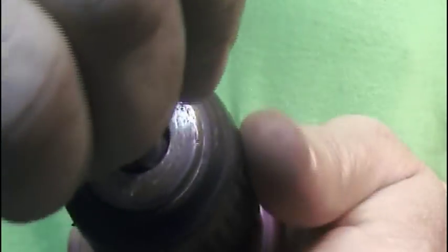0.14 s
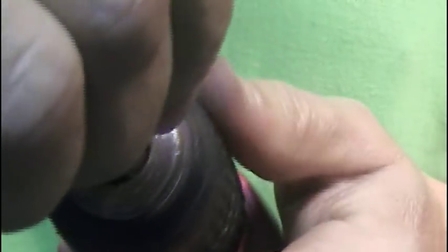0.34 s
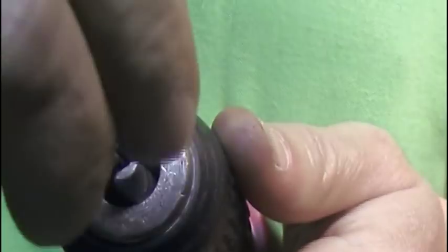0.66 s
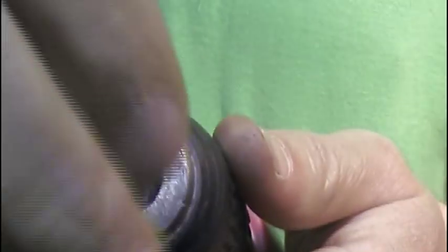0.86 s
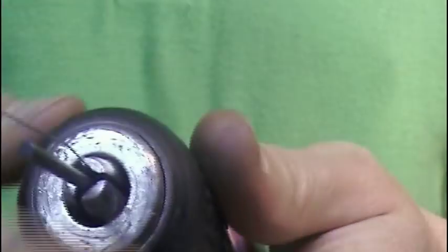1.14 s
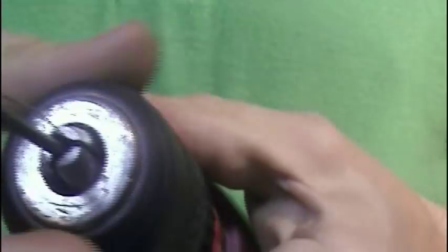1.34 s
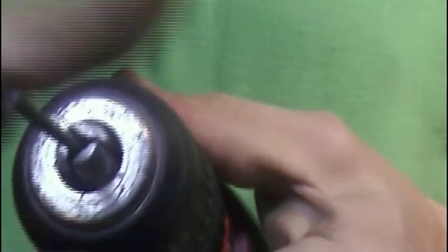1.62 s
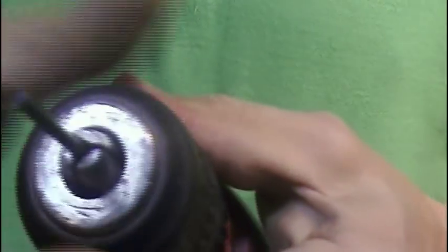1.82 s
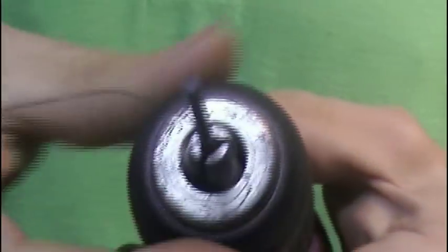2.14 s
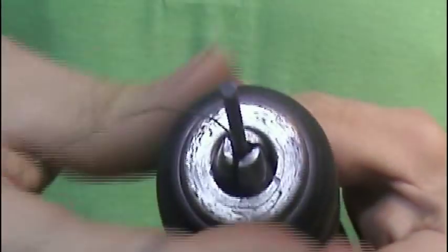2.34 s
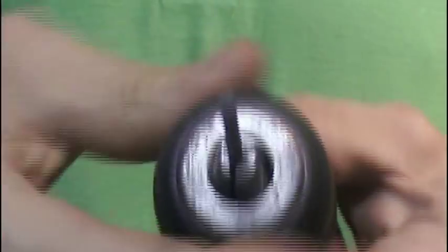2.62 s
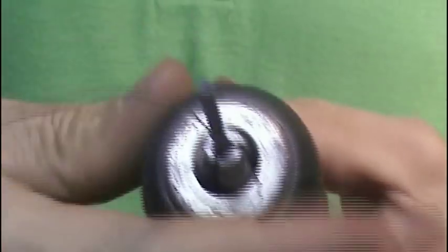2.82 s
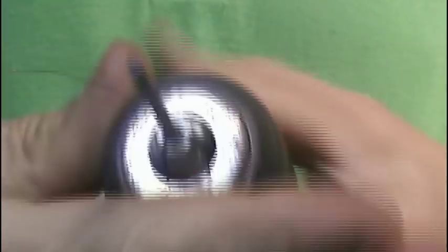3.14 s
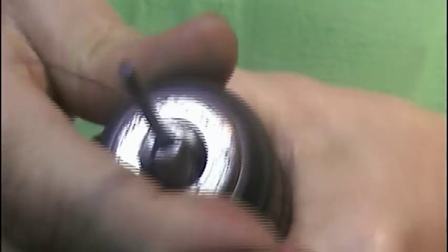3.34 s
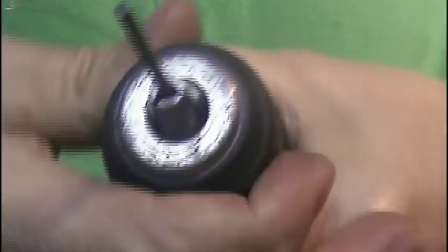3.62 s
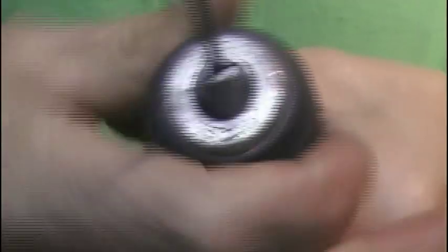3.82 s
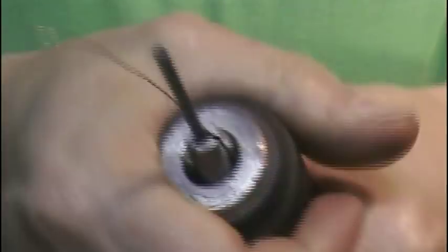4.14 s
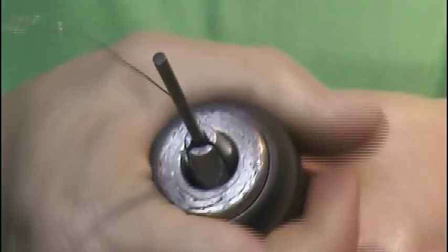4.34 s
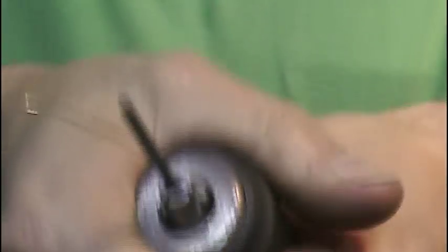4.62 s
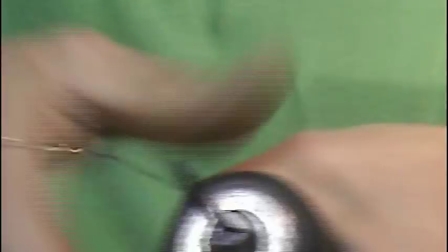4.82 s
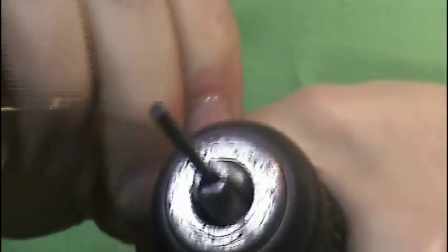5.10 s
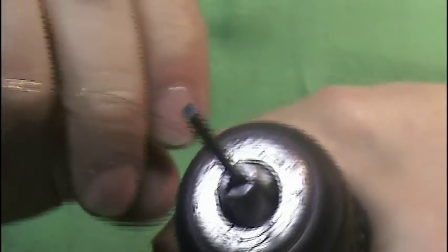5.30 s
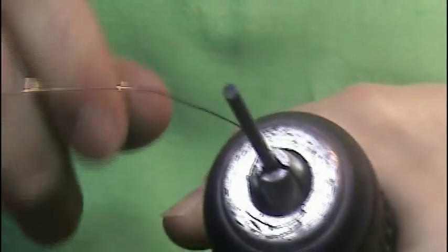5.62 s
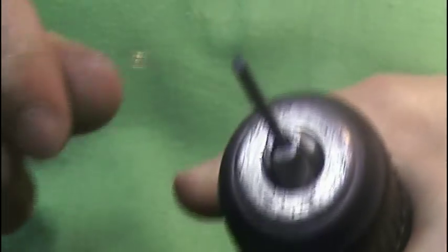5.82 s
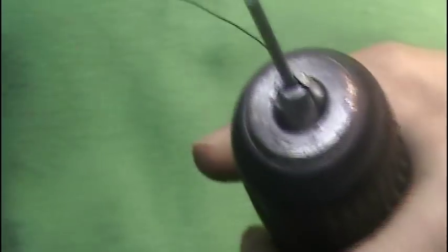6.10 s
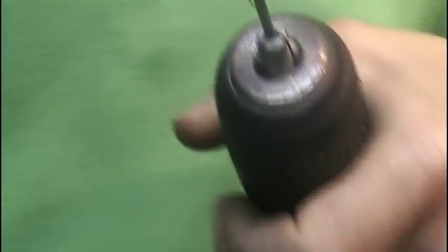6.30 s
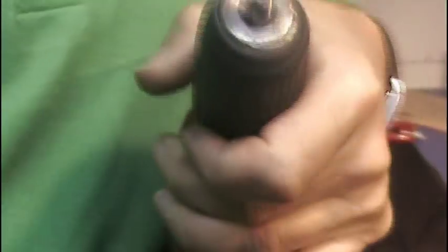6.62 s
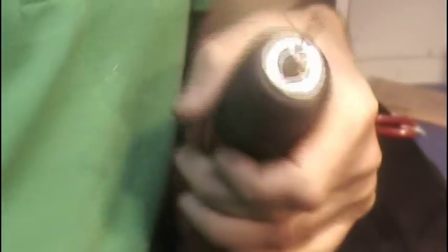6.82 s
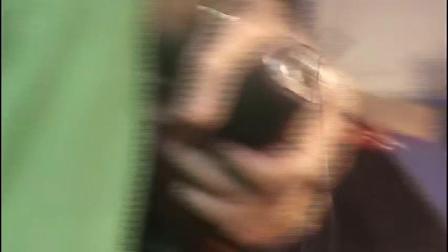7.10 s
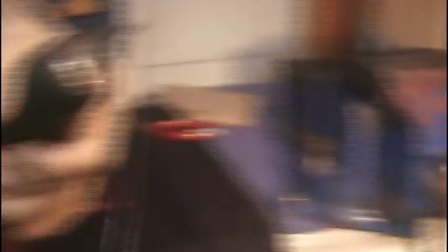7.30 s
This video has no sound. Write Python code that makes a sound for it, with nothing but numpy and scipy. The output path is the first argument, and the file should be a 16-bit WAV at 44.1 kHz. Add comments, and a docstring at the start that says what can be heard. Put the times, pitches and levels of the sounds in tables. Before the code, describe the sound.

Close, dry ratchety clicking and faint scraping of a hand-tightened chuck, a quiet pause, then a grip knock, cloth rustle and double clack.

```python
"""Keyless drill chuck tightened by hand

Hands twist the sleeve shut on a steel pin and a thin wire, close by. Sleeve and jaws click as short noisy
forces on damped bodies; thread and palm scrape as coloured slips; harder knocks ring the housing's modes.
Then the drill is gripped and lifted: cloth noise, knocks of damped modes and a double clack. A quiet
workshop's rumble, hiss and faint whine, made of shaped noise and sines, lie beneath."""
import sys
import numpy as np
from scipy import signal
from scipy.fft import rfft, irfft, next_fast_len
from scipy.io import wavfile
from scipy.ndimage import uniform_filter1d, map_coordinates

SR = 44100
rng = np.random.default_rng(int(sys.argv[2]) if len(sys.argv) > 2 else 0)


def transcribe(u):
    """Save the signal u as a 16-bit wav file named by the first command-line argument.

    u: samples, shape (n,) or (channels, n), limited to [-1, 1]; the rate is SR.
    q: integer samples, one column per channel.
    """
    v = np.clip(np.atleast_2d(u).T, -1, 1)
    q = np.round(v * 32767).astype(np.int16)
    wavfile.write(sys.argv[1], SR, q)


N = 328986
T = np.arange(N) / SR

# Clear contacts of sleeve and jaws. Each row: time in seconds, sleeve level in dB, jaw level in dB re sleeve,
# sleeve pitch in Hz, nominal chatter length in ms.
CONTACTS = [(0.062, -45.5, -2, 1600, 2.2), (0.113, -31.5, 0.5, 1610, 2.6), (0.2447, -32, -2.5, 1170, 1.5),
            (0.2521, -30, -6.5, 1000, 1.1), (0.4526, -44.5, 2, 2030, 2.1), (1.1217, -12, 3, 1680, 2.4),
            (1.2858, -38.5, 0, 2010, 1.4), (1.3327, -31.5, -11, 2120, 3.2), (1.3425, -26, 0.5, 1630, 2.4),
            (1.356, -23.5, -13, 1490, 5.1), (1.3764, -23.5, -2.5, 1470, 13), (1.41, -25, -3, 1880, 3.6),
            (1.5205, -37, -6, 970, 5.5), (1.5474, -28, -10, 1960, 2.1), (1.5616, -16, -8, 1230, 1.7),
            (1.5722, -16, -6, 1350, 4.7), (1.5929, -23.5, -0.5, 1720, 3.8), (1.611, -25, -7, 1170, 1.8),
            (1.6204, -24, -2, 1960, 2.2), (1.6487, -20.5, -13, 1150, 4.3), (1.7124, -20, -0.5, 1710, 2.2),
            (1.7193, -17.5, -9, 1180, 3.1), (1.7767, -22.5, -2.5, 1540, 3.2),
            (1.7929, -18, -4.5, 2100, 9.6), (1.8058, -25, -4, 1650, 4.3), (1.822, -23.5, -3.5, 1420, 3.1),
            (1.8514, -23, -14, 1370, 6), (2.0574, -41, -6, 1410, 2.3), (2.1623, -26.5, -10, 1470, 4.8),
            (2.1893, -26, -6, 1440, 1.9), (2.26, -23.5, -7.5, 1340, 3.1), (2.3182, -28, -4.5, 1080, 8.8),
            (2.425, -26.5, -12, 1960, 1.1), (2.4979, -19.5, -8, 1810, 4.2), (2.5706, -31.5, -8, 1233, 1.4),
            (2.5971, -33.5, -1.5, 1520, 1.1), (2.6372, -19, -1.5, 1403, 2.7), (2.6584, -22, -7, 1460, 2.1),
            (2.6678, -15.5, -4, 1960, 3.4), (2.6886, -27.5, -4.5, 1500, 5.9), (2.7964, -29, -8, 1760, 5),
            (2.8817, -28.5, -3, 1604, 4.2), (2.9476, -17, -1.5, 1470, 3), (3.0531, -21, -14, 1190, 3.3),
            (3.1453, -29, -9.5, 1100, 3), (3.329, -11, -2, 1570, 1.8), (3.4816, -24, -9, 2100, 2.2),
            (3.4999, -25.5, -4.5, 1060, 1.43), (3.5336, -27.5, -7.5, 1430, 2.4),
            (3.6104, -30.5, -6.5, 1680, 3.2), (3.6684, -40.5, 1, 2540, 3.1),
            (3.7106, -20.5, -0.5, 1500, 0.99), (3.8777, -28.5, -10.5, 1074, 3.5),
            (3.8996, -26.5, -15, 980, 0.94), (4.0434, -31.5, -3.5, 1610, 1.8),
            (4.0876, -29.5, 0.5, 1720, 4), (4.1593, -25.5, -10, 2000, 1.94), (4.2405, -28.5, -2, 2157, 2.8),
            (4.305, -40.5, 9, 2150, 0.9), (4.528, -16, -1, 1720, 3.36), (4.6757, -40, 1, 1720, 4.7),
            (5.086, -43.5, -1.5, 1830, 2.9), (5.128, -43.5, 7.5, 1510, 4), (5.1384, -28, -10.5, 1860, 0.81),
            (5.9973, -43.5, 1.5, 2000, 1.2), (7.0798, -28.5, 10, 1690, 1), (7.1024, -28.5, 9.5, 1980, 2.9),
            (7.1067, -24, 1, 1840, 6.1)]
# Twists of the hand on the sleeve. Each row: start in seconds, length in seconds, rubbing in dB before trim.
SLEEVE_TWISTS = [(0.086, .04, -48), (0.251, .13, -49.5), (1.306, 0.087, -40), (1.511, 0.41, -48),
                 (2.139, 0.11, -43), (2.31, 0.14, -43.5), (2.62, .07, -42), (2.751, 0.813, -45.5),
                 (3.519, 0.51, -50.5), (3.985, 0.16, -42), (4.17, .04, -42), (4.321, 0.38, -45.5)]
# Sleeve drags on its thread. Each row: start in seconds, length in seconds, level in dB before trim.
THREAD_DRAGS = [(1.33, 0.07, -35.5), (1.76, 0.054, -38.5), (2.317, 0.029, -33), (2.372, 0.08, -43.5),
                (2.775, 0.057, -42), (2.915, 0.079, -33.5), (3.305, 0.089, -30), (4.325, 0.07, -45)]
# Palm slides off the sleeve. Each row: peak in seconds, level in dB before trim.
PALM_SLIDES = [(4.756, -38.5), (4.818, -45.5)]
# Modes of the hand's knocks on the housing. Each row: time in seconds, nominal level in dB, pitch in Hz,
# t60 in seconds.
HAND_KNOCKS = [(.14, -41.5, 262, 0.085), (5.953, -36.5, 258, 0.066), (6.303, -42, 229.6, 0.22),
               (6.678, -32, 560, 0.062), (6.778, -15, 553, 0.032), (6.78, -22, 1700, .05),
               (7.033, -41, 497, 0.096), (7.235, -41, 192, 0.2)]
# Bumps of the drill that reach the microphone. Each row: time in seconds, nominal level in dB, pitch in Hz,
# t60 in seconds.
DRILL_BUMPS = [(7.071, -23, 37, 0.23), (7.073, -24, 109.4, 0.094), (7.101, -38, 180, 0.14)]
# Hand shifts on the drill and raises it. Each row: peak in seconds, rustle in dB and handling rumble in dB,
# both before trim.
LIFT_MOVES = [(6.13, -45, -65), (6.785, -37, -35.5), (7.15, -34.5, -33)]
# Hand slips on the grip. Each row: start in seconds, length in seconds, level in dB.
GRIP_SLIPS = [(6.61, 0.072, -45.5), (6.674, 0.029, -34.5), (6.745, 0.074, -38), (6.82, 0.042, -45),
              (7.025, 0.063, -48.5)]
# Drill brushes past cloth. Each row: peak in seconds, level in dB before trim.
CLOTH_SWISHES = [(7.17, -46.5), (7.32, -50.5)]

# Ring passed into the housing, changing through the scene. Each row: time in seconds, ring in dB re contact
# before trim.
HOUSING_COUPLING = [(0.2, -8.5), (1.6, -19), (4.5, -7.5), (7.1, -20)]
# Housing resonances. Each row: centre in Hz, width in Hz, level in dB re the broad answer.
HOUSING_RESONANCES = [(594, 70, -0.5), (932, 54, -0.5), (1300, 120, -5), (1800, 49, -3), (2255, 55, 10),
                      (2650, 94, -5), (3280, 450, 1.5), (4030, 120, -7)]
# Resonances of the cupped hand on the grip. Each row: centre in Hz, width in Hz, level in dB re the broad answer.
GRIP_RESONANCES = [(534, 130, -1.5), (1826, 170, 2), (3840, 170, -7)]

# Relative spectra of the bodies and noises. Each row: frequency in Hz, density in dB.
SLEEVE_SPECTRUM = [(40, -10), (200, -12.5), (450, -6), (800, 1), (1300, 1), (2200, -1), (2900, -8.5),
                   (4000, -9.5), (7000, -37), (16000, -60)]
JAW_SPECTRUM = [(300, -59), (1800, -21), (3000, 1.5), (3600, 7), (4700, 2), (5800, -10), (7500, -14),
                (10000, -14), (12500, -22), (15000, -43.5)]
HOUSING_SPECTRUM = [(60, -19), (250, -5.5), (600, -2.5), (1200, 0.5), (1800, 2.5), (2600, -4), (3600, -1),
                    (4500, -6.5), (5800, -11), (10000, -20.5), (12500, -31), (15000, -44)]
THREAD_SPECTRUM = [(100, -11), (400, -2), (900, -5), (1600, 0), (2600, -4), (3500, -3.5), (4600, -13),
                   (6000, -18), (10000, -18.5), (12500, -25), (15000, -44)]
BITE_SPECTRUM = [(100, -25), (400, -4), (900, -4), (1600, 3.5), (2600, 1.5), (3600, -3.5), (4700, -8),
                 (6000, -12.5), (10000, -20), (12500, -34), (15000, -51)]
PALM_SPECTRUM = [(2000, -4.5), (6000, -8), (9500, -1), (12000, -9), (13500, -17.5), (15500, -32)]
CLOTH_SPECTRUM = [(100, -5), (200, 0.5), (330, -7.5), (540, -1), (900, -4.5), (1700, -2.5), (2500, -1.5),
                  (4200, -6.5), (6500, -17), (10000, -24), (12800, -34), (15500, -61)]
BRUSH_SPECTRUM = [(3000, -26), (5200, -2), (5750, 4), (6600, -2.5), (8000, -3), (10000, -10), (13000, -22),
                  (15500, -38)]
HANDLING_SPECTRUM = [(20, -3), (45, 4.5), (90, 0), (200, -13.5), (400, -38), (1200, -51)]
ROOM_SPECTRUM = [(12, -41), (20, -14), (55, -7.5), (88, -14), (162, -20.5), (386, -25.5), (469, -26.5),
                 (510, -29), (586, -28), (637, -30), (819, -30), (2720, -34.5), (4370, -36), (9300, -41),
                 (15800, -63)]
# Faint electrical whine. Each row: frequency in Hz, level in dB before port balance.
WHINE_TONES = [(1490, -73.5), (2980, -74.5), (4500, -72.5)]
# Difference between the ports. Each row: frequency in Hz, side in dB re mid.
SIDE_SPECTRUM = [(100, -14), (300, -14), (550, -17), (1200, -28), (2500, -23.5), (5000, -9.5), (9000, -5),
                 (14000, -10)]

TICKS_PER_S, TICK_OVER_TWIST_DB, TICK_SPREAD_DB = 11, 5, 2  # level is over the twist's table value
TICK_TREBLE_DB, TICK_TREBLE_SPREAD_DB, TICK_CHATTER_MS = -2, 5, 2.6
TICK_HZ, TICK_OCTAVES_PER_DB = 1720, 0.3  # brighter ticks are pitched higher
RING_DB_PER_TREBLE_DB, CLEAN_STRIKE_DB = 1.0, 2.5  # ring grows with treble up to a clean strike


def clicks(contacts, mode_t60_s=0.0035, mode_share=0.27, snap=2.05, chatter_per_s=5000,
           slide=0.054, slide_s=0.00094):
    """Slide, snap and a few ms of chatter drive the damped plastic sleeve and the steel jaws."""
    lead = SR // 200
    track, t = np.zeros(N), np.arange(SR // 40) / SR
    sleeve, jaws = causal(SLEEVE_SPECTRUM), causal(JAW_SPECTRUM)
    for s, db, bright_db, hz, length_ms in contacts:
        decay = np.exp(-(t / (1.22 * length_ms / 1000)) ** 0.9)
        hits = rng.random(len(t)) < chatter_per_s / SR
        chatter = rng.standard_normal(len(t)) * hits * decay
        chatter[0] += snap / length_ms
        # dull contacts slide into place, bright ones strike clean
        slide_gain = slide * 2 / (1 + amp(bright_db))
        approach = slide_gain * rng.standard_normal(lead) * np.exp(-t[:lead][::-1] / slide_s)
        force = np.r_[approach, chatter]
        # the grip damps the sleeve and shifts its main resonance from touch to touch
        mode = mode_share * np.cos(2 * np.pi * hz * t) * amp(-60 * t / mode_t60_s)
        mode[0] += 1
        add(track, s - lead / SR, contact(force, signal.fftconvolve(sleeve, mode), db))
        add(track, s - lead / SR, contact(force, jaws, db + bright_db))
    return track


def ticks(count=16):
    """Faint contacts fall at random while the sleeve turns, louder in a firmer twist; rows like CONTACTS."""
    rows = []
    for start, length, twist_db in SLEEVE_TWISTS:
        times = start + np.cumsum(rng.gamma(2, .5, count)) / TICKS_PER_S
        scatter = np.clip(rng.standard_normal((count, 2)), -2, 2)
        for s, (force, hardness) in zip(times, scatter):
            db = twist_db + TICK_OVER_TWIST_DB + TICK_SPREAD_DB * force
            bright_db = TICK_TREBLE_DB + TICK_TREBLE_SPREAD_DB * hardness
            hz = TICK_HZ * 2 ** (TICK_OCTAVES_PER_DB * bright_db)
            if s < start + length:
                rows.append((s, db, bright_db, hz, TICK_CHATTER_MS))
    return rows


def housing(contacts, t60_s=0.2, trim_db=3, rise_s=0.0017):
    """Dense modes of housing and gears ring after each contact, most after clean strikes."""
    power, t = np.zeros(N), np.arange(SR // 3) / SR
    for s, db, bright_db, _, _ in contacts:
        share_db = np.interp(s, *np.transpose(HOUSING_COUPLING))
        share_db += RING_DB_PER_TREBLE_DB * min(bright_db, CLEAN_STRIKE_DB)
        envelope = amp(db + share_db + trim_db - 60 * t / t60_s) * (1 - np.exp(-t / rise_s))
        add(power, s, envelope ** 2)
    ring = filtered(noise(HOUSING_SPECTRUM), lambda hz: ringing(HOUSING_RESONANCES, hz))
    return np.sqrt(power) * patchy(ring, depth_db=2)


def scraping(rub_trim_db=-4, drag_trim_db=-1, palm_trim_db=-2, uneven_db=4.5):
    """The sleeve rubs round on its thread, bites now and then, and the palm slides off it."""
    rub_gain = strokes(SLEEVE_TWISTS, rise_s=0.027, sag_db=3) * amp(rub_trim_db + uneven_db * wobble(45))
    rub = rub_gain * patchy(friction(THREAD_SPECTRUM, slips_per_s=350, spread_db=9.5, smooth=0.84))
    drag_gain = amp(drag_trim_db) * strokes(THREAD_DRAGS, rise_s=0.0018, sag_db=8.5)
    drag = drag_gain * patchy(friction(BITE_SPECTRUM, slips_per_s=900, spread_db=5, smooth=0.54))
    palm_gain = amp(palm_trim_db) * swells(PALM_SLIDES, rise_s=0.035, fall_s=0.046)[0]
    return rub + drag + palm_gain * noise(PALM_SPECTRUM)


def thuds(rows, rise_s, rough):
    """Knocks and bumps made of damped modes of slightly unsteady pitch; the firm knock at 6.78 s has two."""
    track, t = np.zeros(N), np.arange(SR // 3) / SR
    for s, db, hz, t60_s in rows:
        drift = rough * np.cumsum(rng.standard_normal(len(t))) * np.sqrt(hz / SR)
        envelope = 2 * amp(db - 60 * t / t60_s) * (1 - np.exp(-t / rise_s))
        add(track, s, envelope * np.sin(2 * np.pi * hz * t + drift))
    return track


def lifting(rustle_trim_db=-1, rumble_trim_db=-3, swish_trim_db=-1):
    """Hand and cloth rustle on the drill as it is gripped and raised: slips coloured by the cupped hand."""
    rustle, rumble = swells(LIFT_MOVES, rise_s=0.18, fall_s=0.2)
    pressure = amp(rustle_trim_db) * rustle + strokes(GRIP_SLIPS, rise_s=0.0034, sag_db=-3)
    rub = friction(CLOTH_SPECTRUM, slips_per_s=1100, spread_db=4.5, smooth=0.95)
    rub = filtered(rub, lambda hz: ringing(GRIP_RESONANCES, hz))
    swish = amp(swish_trim_db) * swells(CLOTH_SWISHES, rise_s=0.14, fall_s=0.095)[0]
    swish = swish * patchy(noise(BRUSH_SPECTRUM))
    return pressure * patchy(rub) + swish + amp(rumble_trim_db) * rumble * noise(HANDLING_SPECTRUM)


def workshop(floor_db=-51, apart_db=-2):
    """Steady room rumble and hiss, partly different at each microphone port, with a faint whine."""
    common, apart = noise(ROOM_SPECTRUM), amp(apart_db) * noise(ROOM_SPECTRUM)
    whine = np.zeros(N)
    for hz, db in WHINE_TONES:
        whine += amp(db) * np.sqrt(2) * np.sin(2 * np.pi * hz * T + 1.8 * wobble(60))
    return amp(floor_db) * np.array([common + apart, common - apart]) + whine


def spread(x, scatter_s=0.00066):
    """Both ports hear the same close sound; the moving fingers scatter it a little differently to each."""
    t = np.arange(SR // 200) / SR
    paths = rng.standard_normal((2, len(t))) * t * np.exp(-t / scatter_s)
    paths /= np.linalg.norm(paths, axis=1, keepdims=True)
    a, b = signal.fftconvolve(x[None], paths, axes=1)[:, :N]
    pose = np.pi * wobble(6)
    side = filtered(a * np.cos(pose) + b * np.sin(pose), lambda hz: amp(along(SIDE_SPECTRUM, hz)))
    return np.array([x + side, x - side])


def contact(force, response, db):
    """A body's answer to a force, its energy set to this level over 5 ms."""
    sound = signal.fftconvolve(force, response)
    return amp(db) * sound * np.sqrt(.005 * SR / np.sum(sound ** 2))


def friction(points, slips_per_s, spread_db, smooth):
    """Tiny slips of uneven size on a smooth rub, coloured by the body; rms 1."""
    signs = (rng.random(N) < slips_per_s / SR) * rng.choice([-1, 1], N)
    slips = signs * amp(spread_db * np.clip(rng.standard_normal(N), -2, 2))
    force = unit(slips) + smooth * rng.standard_normal(N)
    return unit(signal.fftconvolve(force, causal(points))[:N])


def strokes(rows, rise_s, sag_db):
    """Pressure of short strokes that catch quickly, then ease off (or swell, if sag_db is negative)."""
    total = np.zeros(N)
    for s, length, db in rows:
        gate = np.interp(T, [s, s + rise_s, s + length, s + length + 4 * rise_s], [0, 1, 1, 0])
        total += gate * amp(db - sag_db * (np.clip((T - s) / length, 0, 1) - .5))
    return total


def swells(rows, rise_s, fall_s):
    """Gain per dB column of movements that swell and die away, by 20 dB in rise_s and in fall_s."""
    peaks, *columns = np.transpose(rows)
    since = T - peaks[:, None]
    shape = amp(-20 * np.maximum(-since / rise_s, since / fall_s))
    return [amp(db) @ shape for db in columns]


def ringing(modes, hz):
    """A broad answer with narrow resonances standing out of it."""
    response = 1
    for centre, width, db in modes:
        damping = 1j * hz * width
        response = response + amp(db) * damping / (centre ** 2 - hz ** 2 + damping)
    return response


def patchy(x, depth_db=3, size=1024):
    """The shifting grip favours other resonances from moment to moment; rms 1."""
    z = signal.stft(x, nperseg=size)[2]
    field = uniform_filter1d(rng.standard_normal(z.shape), size=6, axis=0)
    field = uniform_filter1d(field, size=5, axis=1)
    # half the depth in the high treble
    depth = depth_db * along([(4500, 1), (9000, .5)], np.fft.rfftfreq(size, 1 / SR))
    return unit(signal.istft(z * amp(depth[:, None] * unit(field)), nperseg=size)[1][:N])


def noise(points):
    """Smooth coloured noise of rms 1."""
    return unit(filtered(rng.standard_normal(N), lambda hz: amp(along(points, hz))))


def wobble(knots_per_s):
    """A smooth random curve."""
    return map_coordinates(rng.standard_normal(int(N * knots_per_s / SR) + 4), [T * knots_per_s])


def causal(points, size=2048):
    """Minimum-phase impulse response of this spectrum, by folding its cepstrum."""
    cepstrum = irfft(np.log(amp(along(points, np.fft.rfftfreq(size, 1 / SR)))))
    cepstrum[1:size // 2] *= 2
    cepstrum[size // 2 + 1:] = 0
    return irfft(np.exp(rfft(cepstrum)))[:size // 2]


def filtered(x, response):
    """x times a response of frequency."""
    m = next_fast_len(N + SR // 4)
    return irfft(rfft(x, m) * response(np.fft.rfftfreq(m, 1 / SR)), m)[..., :N]


def along(points, hz):
    """(Hz, value) points read on a log axis."""
    f, v = np.transpose(points)
    return np.interp(np.log(hz + 1), np.log(f), v)


def add(track, s, sound):
    """Mix a sound into the track at time s."""
    part = track[max(round(s * SR), 0):][:len(sound)]
    part += sound[:len(part)]


def amp(db):
    """Decibels to gain."""
    return 10 ** (np.asarray(db) / 20)


def unit(x):
    """Scale to rms 1."""
    return x / np.sqrt(np.mean(x ** 2) + 1e-20)


def scene():
    """The drill in the hands, in front of the room's floor."""
    contacts = CONTACTS + ticks()
    drill = clicks(contacts) + housing(contacts) + scraping() + lifting()
    drill += thuds(HAND_KNOCKS, rise_s=0.0023, rough=0.74)
    drill += thuds(DRILL_BUMPS, rise_s=0.0045, rough=0.92)
    port_balance_db = [[.5], [-.5]]
    return spread(drill) + workshop() * amp(port_balance_db)


def record(dry, top_hz=15900):
    """The sound cuts out for an instant; peaks clip near full scale and the band ends at top_hz."""
    gap = np.interp(T, [4.380, 4.382, 4.424, 4.425], [1, .01, .01, 1])
    clipped = np.clip(dry * gap, -.93, .93)
    return filtered(clipped, lambda hz: np.clip((top_hz - hz) / 600 + .5, 0, 1))


dry = scene()
out = record(dry)
transcribe(out)
```